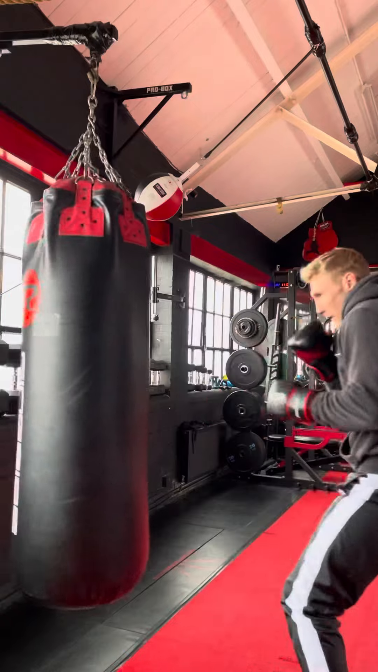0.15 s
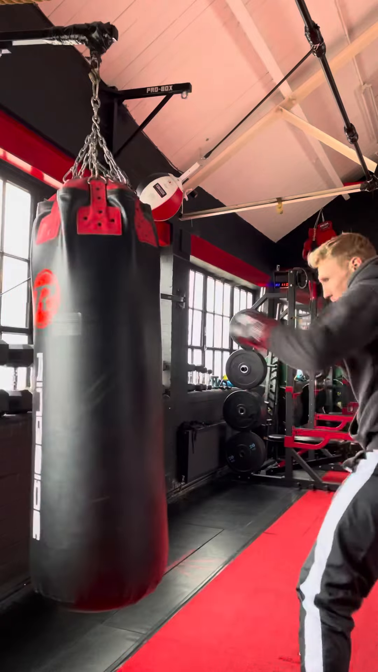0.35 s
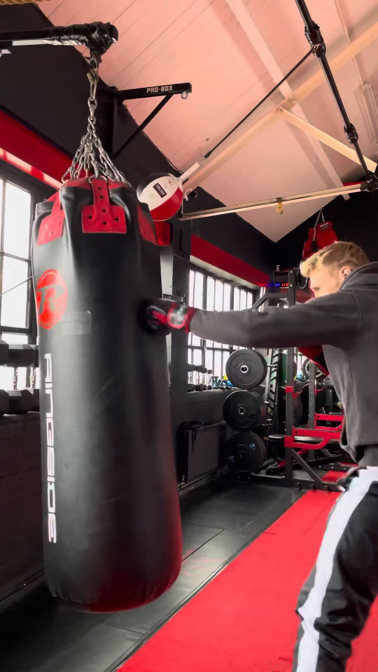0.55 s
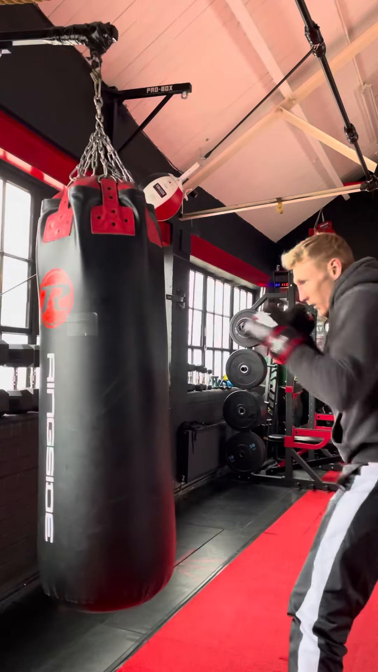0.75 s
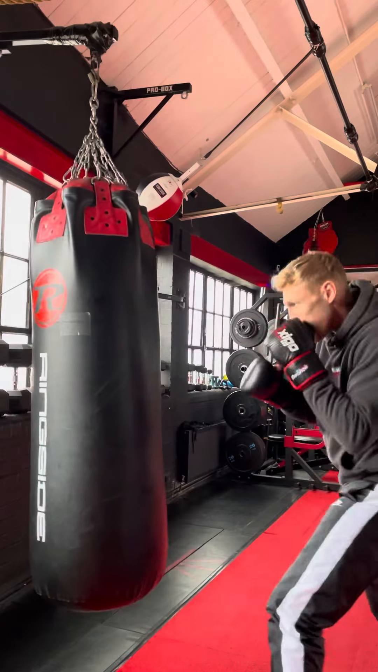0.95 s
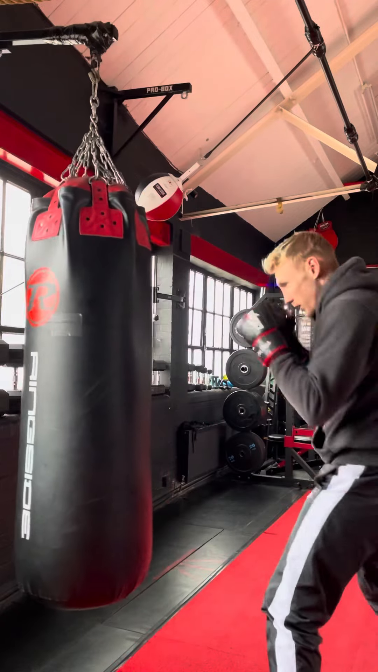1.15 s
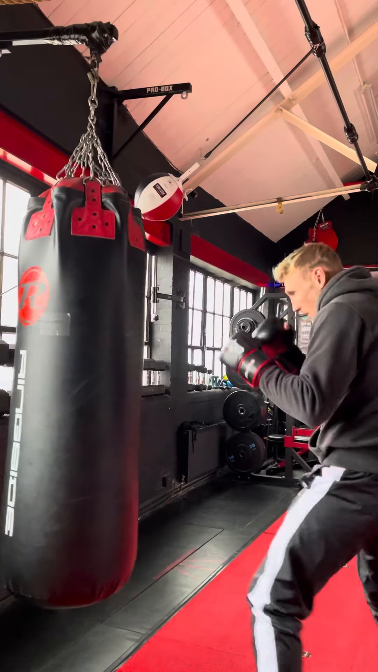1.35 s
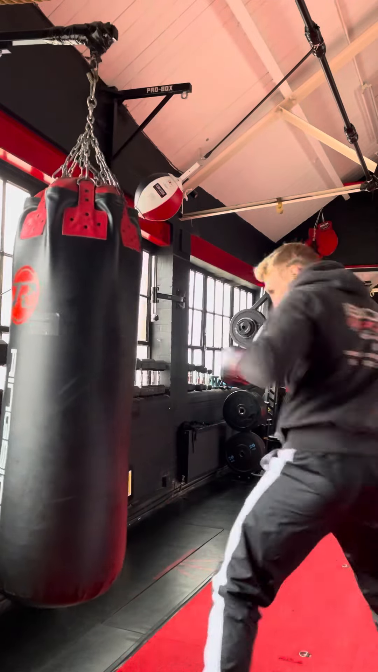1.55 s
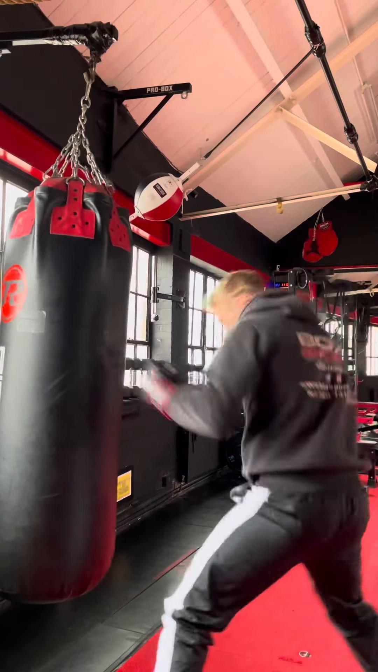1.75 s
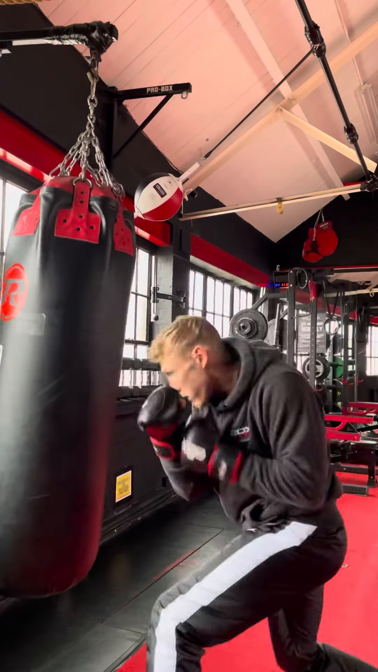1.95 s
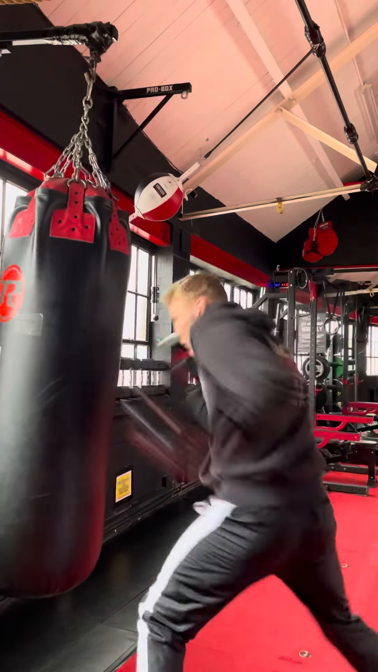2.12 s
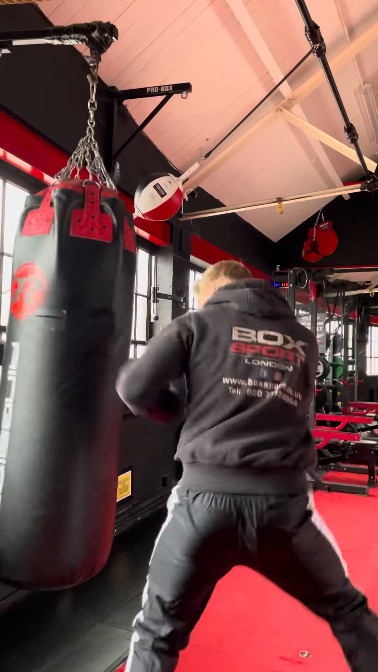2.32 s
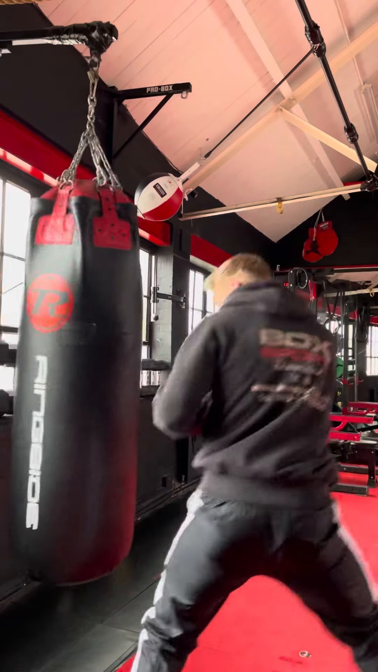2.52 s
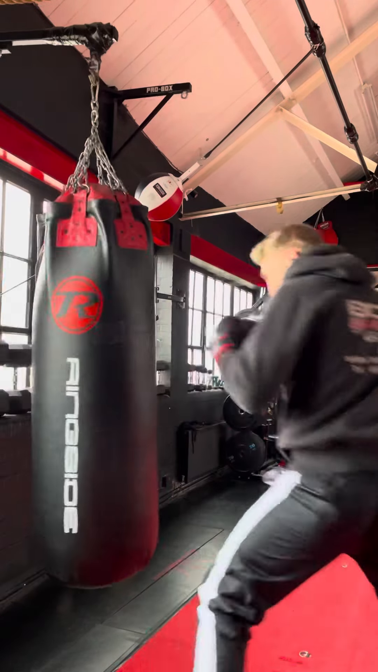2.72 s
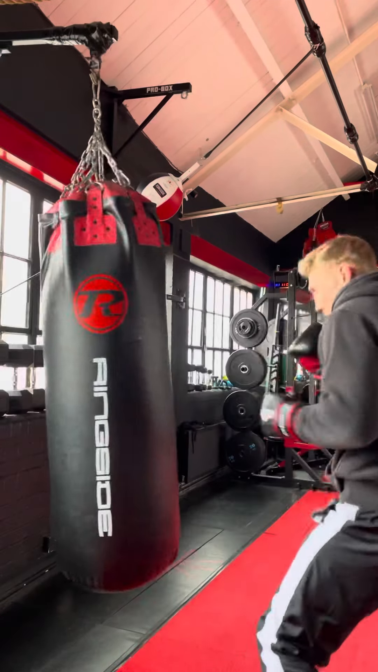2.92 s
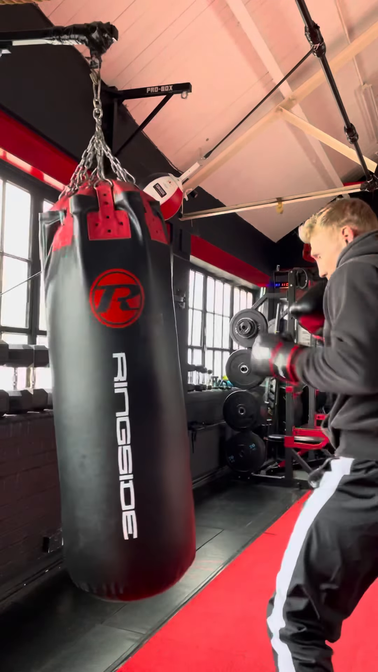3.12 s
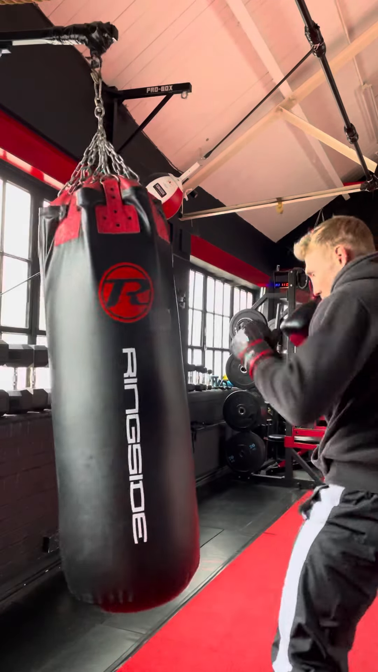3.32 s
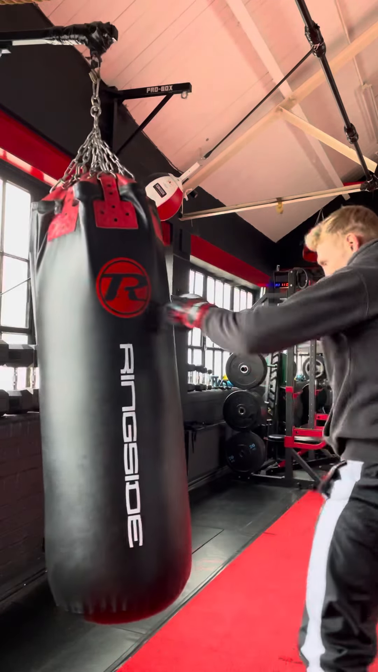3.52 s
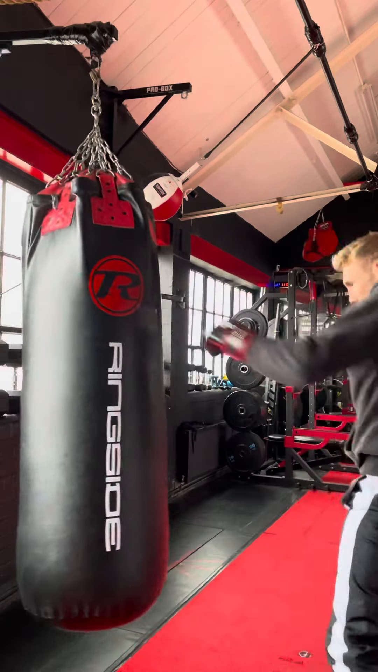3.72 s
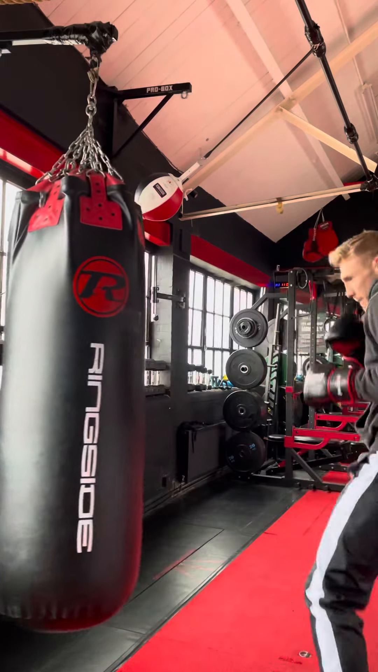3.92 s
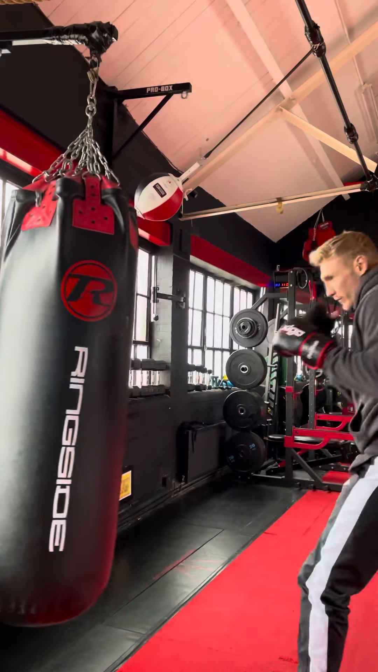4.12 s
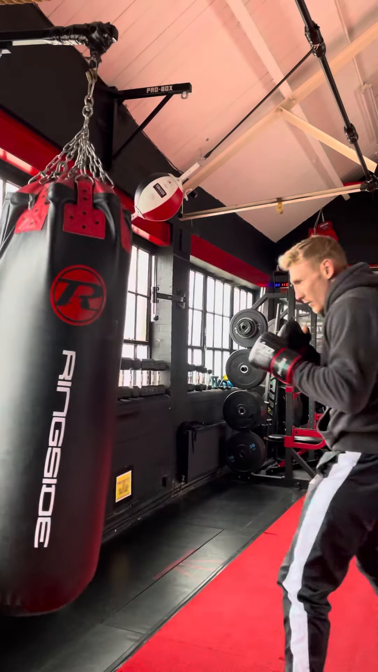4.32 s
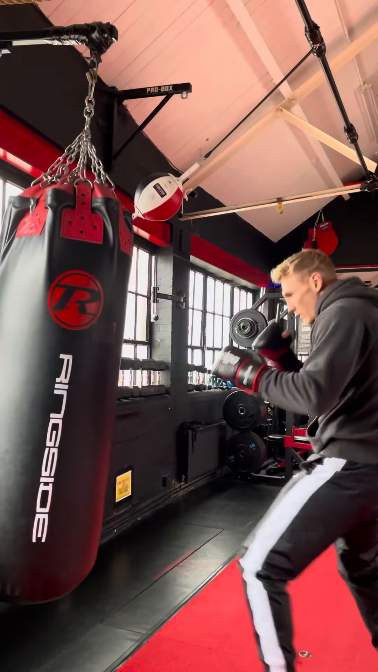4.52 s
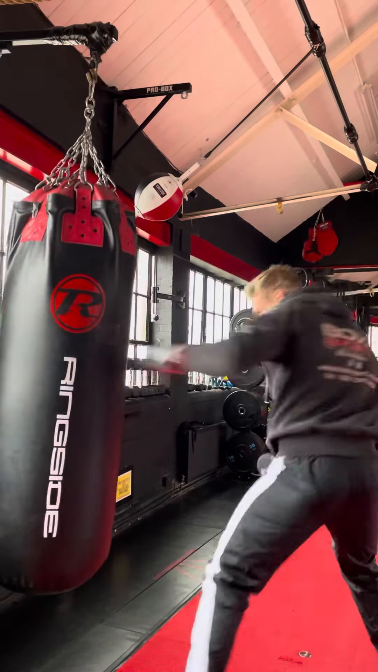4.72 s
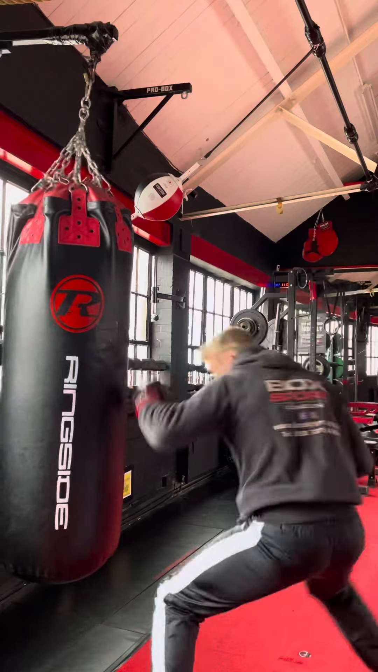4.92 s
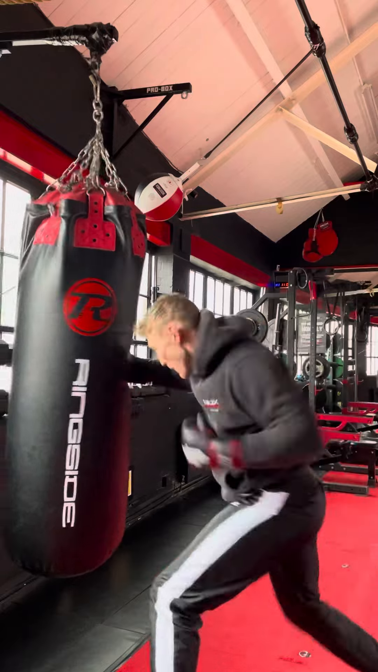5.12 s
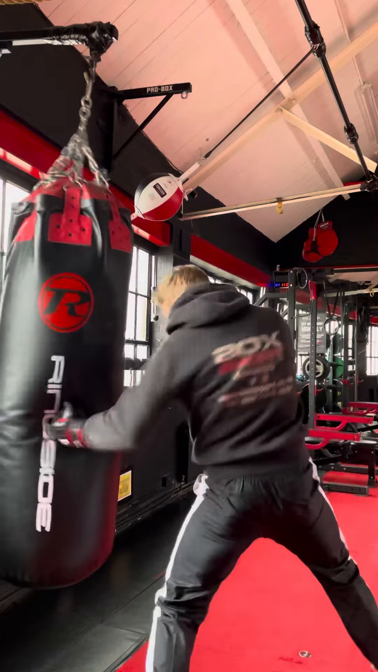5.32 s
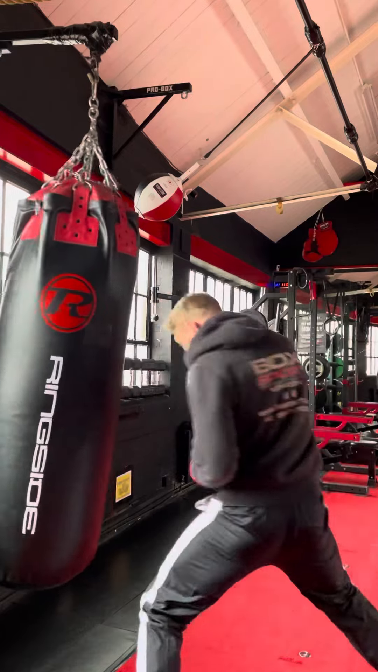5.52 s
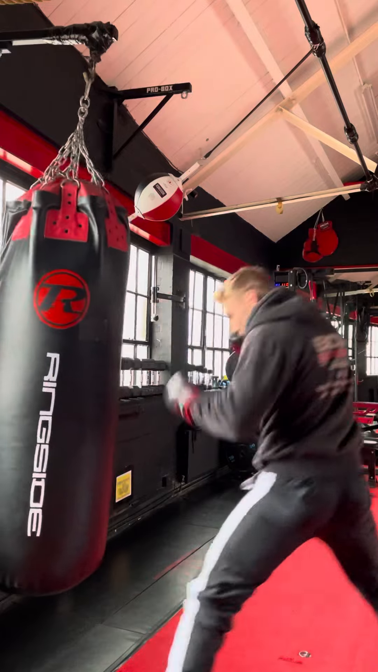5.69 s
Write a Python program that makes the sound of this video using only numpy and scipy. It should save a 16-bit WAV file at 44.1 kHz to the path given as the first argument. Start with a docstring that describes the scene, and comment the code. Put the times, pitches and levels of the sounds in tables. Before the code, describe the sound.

Gloved fists hit a hanging leather heavy bag, heard close up in an echoing gym over faint, low room noise. A light punch lands at about 0.5 seconds, followed by a few thin chain clinks. Hard blows come at 1.6 and 2.2 seconds, each a sharp slap with a low thud and a bass-heavy echo lasting under a second; the second is deeper. The chain jingles and clinks very high from 1.7 until just after 3 seconds. A quieter stretch follows, with soft shoe scuffs, rustling clothes and a faint creak from the swaying bag. Three hard punches land quickly at about 4.8, 5.1 and 5.3 seconds, the last two with a deeper thump. The chain jingles again until the end, near 6 seconds, while a low hum from the wall bracket grows underneath.

```python
"""Sharp cracks and thuds boom through a gym: gloved fists hitting a hanging heavy bag.
Each glove slaps the leather and flattens; a low pulse follows, and the far walls answer in throbs.
Loaded chain links slip with high clinks, the shaken chain jingles and the wall bracket hums.
Feet and clothes scuff between the blows. A phone with two microphone ports hears it from close by."""
import sys
import numpy as np
from scipy import signal
from scipy.fft import rfft, irfft, next_fast_len
from scipy.io import wavfile
from scipy.ndimage import uniform_filter1d

SR = 44100
rng = np.random.default_rng(int(sys.argv[2]) if len(sys.argv) > 2 else 0)


def to_wav(s):
    """Save 16-bit WAV."""
    ch = np.atleast_2d(s).T  # columns
    pcm = np.round(np.clip(ch, -1, 1) * 32767)  # PCM
    wavfile.write(sys.argv[1], SR, pcm.astype(np.int16))


N = 253619

# The blows: (time [s], force [dB], crack [dB], second slap re first [dB], its delay [s], kind)
PUNCHES = [(0.461, -38.5, -17.5, -11, 0.0028, "straight"), (1.6425, -22.5, -7, -7, 0.0044, "straight"),
           (2.2078, -22.5, -6, 3.5, 0.0054, "hook"), (4.754, -22, -4.5, -4, 0.0041, "straight"),
           (5.1201, -22, -8, -2.5, 0.0047, "hook"), (5.3274, -22, -6, -0.5, 0.0027, "hook")]
# Layer balance of a full blow, by kind: (thud [dB], throbs [dB], heave [dB], hiss [dB],
# low pulse (delay [s], pitch [Hz], level re thud [dB]))
BLOW_KINDS = {"straight": (9.9, 3.1, -23, -12, (0.0237, 122, 0.81)),
              "hook": (15.7, -18, 2.5, 1.5, (.015, 62, -6.5))}
FULL_DB, LEAD_IN_S = -21, .03  # force of a full blow; room for the hiss before the crack
THUD_SLOPE, DEEP_SLOPE = 0.88, 3.3  # dB per dB of force


def punch(force_db, crack_db, second_db, delay, kind):
    """A brief hiss swells, then the glove hits; with less force, heave and hiss fade faster than thud."""
    thud_db, throb_db, heave_db, hiss_db, pulse = BLOW_KINDS[kind]
    over_db = force_db - FULL_DB
    deep_db = FULL_DB + DEEP_SLOPE * over_db
    t = np.arange(SR // 2) / SR - LEAD_IN_S
    age = np.maximum(t, 0)
    slap, noise = rng.standard_normal((2, len(t)))
    swell = np.exp(-(np.minimum(t + 0.0024, 0) / 0.0067) ** 2 - age / 0.0004)
    hiss = evened(colour(noise, RUSTLE_EQ)) * swell
    return (gain_of(crack_db) * crack(t, age, slap, second_db, delay)
            + gain_of(deep_db + hiss_db) * hiss
            + gain_of(FULL_DB + thud_db + THUD_SLOPE * over_db) * thud(t, age, noise, *pulse)
            + gain_of(deep_db + heave_db) * heave(age)
            + gain_of(force_db + throb_db) * throbs(t))


# Tone of glove on leather: (frequency [Hz], level [dB])
SLAP_EQ = [(200, 12), (1200, 4), (2500, -0.5), (4200, -1), (6000, -2), (9000, -4), (13000, -34)]
SNAP_S, STUTTER_S = .00028, .0017  # attack of a slap; gap within the second slap


def crack(t, age, noise, second_db, delay):
    """The glove slaps twice, the second time in two parts, over a short noisy tail."""
    rises = [np.maximum((t - s) / SNAP_S, 0) for s in (0, delay, delay + STUTTER_S)]
    first, second, stutter = (rise * np.exp(1 - rise) for rise in rises)
    tail = (t > 0) * gain_of(-14 - 60 * age / 0.063)
    return evened(colour(noise, SLAP_EQ)) * (first + gain_of(second_db) * (second + stutter) + tail)


# Modes of the struck bag and thin ring of the bracket arm: (pitch [Hz], level re thud [dB], t60 [s])
LEATHER_MODES = [(176, -8, 0.053), (332, -15, 0.036)]
ARM_MODES = [(2090, -25, 0.72), (4160, -23.5, 0.64)]


def thud(t, age, noise, pulse_s, pulse_hz, pulse_db):
    """Pitch dives as the glove flattens; a low pulse follows about 20 ms on, like a near wall's echo."""
    turns = np.cumsum((t > 0) * (245 + 1600 * np.exp(-age / 0.001027))) / SR
    knock = np.sin(2 * np.pi * turns) * bump(t - 0.0045, 0.0035)
    leather = ring(LEATHER_MODES, age) * (1 - bump(age, 0.00097))
    pulse = gain_of(pulse_db) * np.cos(2 * np.pi * pulse_hz * (t - pulse_s)) * bump(t - pulse_s, 0.0052)
    arm = ring(ARM_MODES, age) * (1 - np.exp(-age / 0.079)) * evened(uniform_filter1d(noise, size=900))
    return knock + leather - pulse + arm


# Low modes of the whole bag: (pitch [Hz], level [dB], t60 [s])
HEAVE_MODES = [(39.4, -4.5, 1), (60, -3, 0.13)]


def heave(age):
    """The whole bag answers with a soft-edged bass note."""
    return ring(HEAVE_MODES, age) * (1 - np.exp(-age / 0.0043))


# Bass returns from the far walls: (delay [s], pitch [Hz], level [dB])
THROBS = [(0.063, 105, -0.5), (.13, 116, -1.5), (.245, 105, -3), (0.323, 111, -9.5)]
THROB_S = 0.014  # half-width of one throb


def throbs(t):
    """The boom comes back as separate low pulses."""
    return sum(gain_of(db) * np.sin(2 * np.pi * hz * (t - s)) * bump(t - s, THROB_S)
               for s, hz, db in THROBS)


# Reverb send of a blow: (frequency [Hz], level [dB])
BOOM_EQ = [(45, 10), (100, 17), (200, 13.5), (400, 10), (1000, 2.5), (2500, -2.5), (5000, -4.5),
           (9000, -10), (13000, -17.5)]


def boom(force_db):
    """A blow fills the hall with a bass-heavy tail whose first 0.1 s sits at the force level."""
    tail = colour(hall(), BOOM_EQ)
    return gain_of(force_db) * tail / np.sqrt(np.mean(tail[:, :SR // 10] ** 2))


# The loudest slips of a link or hook: (time [s], level [dB], pitch [Hz])
CLINKS = [(0.073, -35, 10370), (0.076, -34, 11500), (0.863, -29.5, 11650), (0.952, -17.5, 11650),
          (1.1314, -20.5, 11650), (1.3145, -22, 11700), (1.687, -17.5, 11460), (1.924, -20.5, 11850),
          (2.014, -22, 11630), (2.1106, -16, 11550), (2.403, -24.5, 11000), (2.5073, -18.5, 9180),
          (2.535, -22, 9500), (2.657, -30.5, 5310), (2.73, -19.5, 12080), (2.748, -21, 9080),
          (2.7594, -20.5, 9470), (2.8284, -17, 11300), (2.927, -27, 10800), (2.9338, -15.5, 11480),
          (3.0265, -25, 11500), (3.1154, -26.5, 11630), (3.388, -38.5, 9730), (4.806, -15, 11550),
          (5.06, -15, 11330), (5.3763, -20, 10970), (5.635, -22, 11550)]
SLIPS_PER_S, SLIP_DB, SLIP_HZ, SLIP_SPREAD_HZ = 4, 2, 11450, 150  # faint random slips; dB re the shake


def clink(db, hz):
    """A loaded link slips and rings; high links bend up as the load comes on, low ones ring longer."""
    t = np.arange(SR // 4) / SR
    judder, waver = (evened(uniform_filter1d(v, size=60)) for v in rng.standard_normal((2, len(t))))
    bend = (hz > 8000) * 0.031 * (.3 - np.exp(-t / 0.0136))
    turns = np.cumsum(hz * (1 + bend + 0.0091 * waver)) / SR
    envelope = gain_of(db - 60 * t * hz / 780 + 1.2 * judder) * np.minimum(t / 0.0086, 1)
    return envelope * np.sin(2 * np.pi * turns)


# Spells of jingling: (time [s], level [dB], length [s])
SHAKES = [(0, -54, 0.044), (0.15, -43, 0.11), (0.5, -37.5, 0.26), (0.77, -37, 0.17), (1.71, -23.5, 0.12),
          (1.841, -20.5, 0.21), (2.204, -23, 0.89), (4.782, -21.5, 0.37), (5.174, -19.5, 0.77)]
SHAKE_RISE_S, SAG_DB_PER_S, STOP_DB_PER_S, REST_DB = 0.05, 21.5, 80, -69


def shaking():
    """Gain envelope of the chain: each spell swells, sags while it lasts and then dies out."""
    s, db, length = np.array(SHAKES).T[:, :, None]
    t = np.arange(N) / SR - s
    attack = np.clip(t / SHAKE_RISE_S, 0, 1) ** 2
    fall_db = SAG_DB_PER_S * t + STOP_DB_PER_S * np.maximum(t - length, 0)
    return gain_of(REST_DB) + (attack * gain_of(db - np.maximum(fall_db, 0))).sum(0)


# Resonances of the links: (pitch [Hz], width [Hz], level [dB])
LINK_MODES = [(13200, 90, -10), (13340, 75, 0), (13520, 80, -5), (13720, 80, -7)]
# Band-pass on that ring, and tone of the fizz below it: (frequency [Hz], level [dB])
JINGLE_EQ = [(12900, -40), (13100, 0), (13850, 0), (14050, -40)]
FIZZ_EQ = [(5000, -18), (7500, 22), (9300, 14), (11500, 10), (12300, 22), (13300, -26)]


def chain(shake):
    """Shaken links ring in a narrow treble band over a grainy fizz."""
    jingle = shake * evened(colour(resonate(grainy(2.9, 0.065), LINK_MODES), JINGLE_EQ))
    fizz = gain_of(-20.5) * shake ** 0.94 * evened(colour(grainy(3.1, 0.023), FIZZ_EQ))
    return jingle + fizz


# The clearest scuffs: (time [s], level [dB], centre [Hz], decay time [s])
SCUFFS = [(0.211, -43, 3030, 0.0028), (0.311, -48.5, 1220, 0.005), (0.641, -41.5, 3600, 0.013),
          (0.8066, -40, 2360, 0.0087), (0.93, -43, 3450, 0.02), (1.541, -48.5, 694, 0.031),
          (2, -40.5, 3330, 0.042), (2.653, -36, 5560, 0.021), (2.781, -35, 214, 0.14),
          (2.932, -35.5, 332, 0.027), (3.025, -31, 1920, 0.0052), (3.04, -37, 2840, 0.021),
          (3.388, -46.5, 2070, 0.0064), (3.542, -40, 336, 0.12), (3.561, -42.5, 3260, 0.0071),
          (4.192, -52, 4400, 0.01), (3.844, -47, 2770, 0.0094), (4.2546, -47, 295, 0.071),
          (4.344, -46, 403, 0.54)]
# Faint random scuffs; dB re the stir of bag and clothes
BRUSHES_PER_S, BRUSH_DB, BRUSH_HZ, BRUSH_S = 2, -4, (1000, 4000), (.005, .03)


def scuff(db, hz, length):
    """Sole or cloth touches with a tick, then brushes: a noise band, wider when shorter or lower."""
    t = np.arange(0, .05 + 4 * length, 1 / SR)
    wide = 1 + 120 / hz + .006 / length
    band = [(hz / wide ** 4, -70), (hz / wide, -6), (hz, 0), (hz * wide, -6), (hz * wide ** 4, -70)]
    tick_band = [(hz * (f / hz) ** 3, level) for f, level in band]  # three times the octaves
    brush = evened(colour(rng.standard_normal(len(t)), band))
    tick = evened(colour(colour(rng.standard_normal(len(t)), RUSTLE_EQ), tick_band))
    tick *= 2 * np.exp(-t / 0.0018 - length / 0.28)  # fainter in long slides
    return gain_of(db) * (np.minimum(t / 0.004, 1) * np.exp(-t / length) * brush + tick)


# Fader moves: (time [s], bracket hum [dB], stir of bag and clothes [dB])
MOTION = [(0, -54, -42.5), (.42, -53, -49), (.95, -47, -44), (1.25, -53, -55.5), (1.5, -42.5, -56.5),
          (2.0, -50, -41.5), (2.72, -39.5, -37.5), (2.86, -45.5, -41.5), (3.45, -56.5, -47.5),
          (3.8, -43.5, -47.5), (4.1, -56, -55), (4.25, -43, -51.5), (4.7, -49, -52), (5.05, -37, -34),
          (5.75, -29.5, -39.5)]


def motion():
    """Gain envelopes of the hum and the stir."""
    times, *faders = np.transpose(MOTION)
    return [gain_of(np.interp(np.arange(N) / SR, times, db)) for db in faders]


# Resonances of the wall bracket: (pitch [Hz], width [Hz], level [dB])
BRACKET_MODES = [(75.5, 10.5, -2), (94.5, 24, -0.5)]


def bracket(hum):
    """The bracket hums low, with a flickering level."""
    return hum * resonate(grainy(flicker_db=4, grain_s=0.05), BRACKET_MODES)


# Tone of the bag's creak: (frequency [Hz], level [dB])
CREAK_EQ = [(100, -5.5), (170, -2), (330, -4.5), (450, -4.5), (800, -11), (2500, -30)]
SWAY_HZ, SWAY_WIDTH_HZ, SWAY_DB = 46.4, 11, -10  # dB re the stir


def swinging_bag(stir):
    """The bag sways with a deep rumble and a grainy creak."""
    sway = gain_of(SWAY_DB) * resonate(grainy(3.5, 0.14), [(SWAY_HZ, SWAY_WIDTH_HZ, 0)])
    creak = evened(colour(grainy(3.1, .02), CREAK_EQ))
    return stir * (sway + creak)


# Tone of rustling cloth, also used for hiss and ticks: (frequency [Hz], level [dB])
RUSTLE_EQ = [(300, -18), (800, -4), (1500, -2), (3000, -4), (5000, -6.5), (7000, -7), (10000, -143)]
RUSTLE_DB, STIR_MID_DB, RUSTLE_SLOPE = -52, -47, 1.3  # level at middling stir; that stir; dB per dB


def clothes(stir):
    """Cloth rustles, growing faster than the stir."""
    level = gain_of(RUSTLE_DB) * (stir / gain_of(STIR_MID_DB)) ** RUSTLE_SLOPE
    return level * evened(colour(grainy(4.3, 0.11), RUSTLE_EQ))


# Reverb time of the gym: (frequency [Hz], t60 [s])
HALL_DECAY = [(60, 0.64), (250, 0.76), (1500, 0.93), (4000, 0.85), (12000, 0.51)]


def hall():
    """Two tails of sparse reflections of random sign, each band dying at its own speed."""
    taps = np.zeros((2, 3 * SR // 2))
    slots = np.arange(400, taps.shape[1] - 16, 16)
    at = slots + rng.integers(0, 16, (2, len(slots)))
    np.put_along_axis(taps, at, rng.choice([-1., 1.], at.shape), 1)
    hz, t, bands = signal.stft(taps, SR, nperseg=512)
    ripple_db = 2.16 * evened(uniform_filter1d(rng.standard_normal(bands.shape[1:]), size=9, axis=0))
    decay_db = 60 * t / read(HALL_DECAY, hz)[:, None]
    tail = signal.istft(bands * gain_of(ripple_db - decay_db), SR, nperseg=512)[1]
    tail *= 1 - 0.52 * bump(np.arange(tail.shape[1]) / SR, 0.032)  # the returns build up
    return tail / np.linalg.norm(tail[0])


# Room tone: (frequency [Hz], level [dB])
AIR_EQ = [(25, -55), (97, -11.5), (217, -27), (4870, -56), (7310, -70), (10100, -93), (14000, -96)]
AIR_DB = -56.5


def air():
    """Still air lays a dark, nearly steady bed."""
    return gain_of(AIR_DB) * evened(colour(grainy(0.67, 0.046), AIR_EQ))


# Match of spread sound between the ports: (frequency [Hz], likeness [0-1])
PORT_LIKENESS = [(100, 1), (250, 0.99), (500, 0.79), (3000, 0.24), (7000, 1), (12000, 0.97)]
# Left port ahead of right: (frequency [Hz], phase [rad])
PORT_PHASE = [(150, 0), (1030, -.5), (1810, -.1), (4050, -.9), (5800, -1.5), (7000, -3.1), (8300, -3.1),
              (10100, -.2), (12300, .3), (12700, 2.7)]
# Left port over right: (frequency [Hz], level [dB])
PORT_BALANCE = [(100, 0.5), (270, 0.5), (700, 6.5), (1300, 3), (2400, 0.5), (8000, 1)]


def ports(direct, spread):
    """Two ports hear direct sound alike and spread sound partly alike, shifted in phase and level."""
    size = next_fast_len(N)
    hz = np.fft.rfftfreq(size, 1 / SR)
    likeness = np.clip(read(PORT_LIKENESS, hz), 0, 1)
    centre = rfft(direct, size)
    shared, apart = rfft(spread, size)
    shift = gain_of(read(PORT_BALANCE, hz) / 2) * np.exp(.5j * read(PORT_PHASE, hz))
    left = (centre + shared) * shift
    right = (centre + likeness * shared + np.sqrt(1 - likeness ** 2) * apart) / shift
    return irfft(np.array([left, right]), size)[:, :N]


def gain_of(db):
    """dB to amplitude."""
    return 10 ** (np.asarray(db) / 20)


def evened(x):
    """Scales to rms 1."""
    return x / np.sqrt(np.mean(x ** 2) + 1e-20)


def bump(t, width):
    """Bell-shaped envelope around t = 0."""
    return np.exp(-(t / width) ** 2)


def read(points, hz):
    """Reads a spectrum table on a log-frequency axis."""
    f, value = np.transpose(points)
    return np.interp(np.log(hz + 1), np.log(f + 1), value)


def add(mix, s, sound):
    """Mixes a sound in at time s."""
    part = mix[round(s * SR):][:len(sound)]
    part += sound[:len(part)]


def colour(x, points):
    """Applies an EQ curve along the last axis."""
    size = next_fast_len(x.shape[-1])
    gain = gain_of(read(points, np.fft.rfftfreq(size, 1 / SR)))
    return irfft(rfft(x, size) * gain, size)[..., :x.shape[-1]]


def ring(modes, t):
    """Dying modes struck at t = 0."""
    return sum(gain_of(db - 60 * t / t60) * np.sin(2 * np.pi * hz * t) for hz, db, t60 in modes)


def resonate(x, modes):
    """Sum of steep resonances (each applied twice)."""
    out = 0
    for hz, width, db in modes:
        carrier = np.exp(2j * np.pi * hz * np.arange(x.shape[-1]) / SR)
        pole = np.exp(-np.pi * width / SR)
        slow = signal.lfilter([1], np.convolve([1, -pole], [1, -pole]), x / carrier)
        out = out + gain_of(db) * evened((carrier * slow).real)
    return evened(out)


def grainy(flicker_db, grain_s):
    """Two unrelated noises whose level flickers together."""
    flicker = evened(uniform_filter1d(rng.standard_normal(N), max(round(grain_s * SR), 1)))
    return rng.standard_normal((2, N)) * gain_of(flicker_db * flicker)


def scene():
    """Close blows, scuffs and clinks over a wide bed; blows and clinks feed the hall."""
    hum, stir = motion()
    shake = shaking()
    near, links = np.zeros((2, N))
    spread = air() + bracket(hum) + swinging_bag(stir) + clothes(stir) + chain(shake)
    for s, force_db, *row in PUNCHES:
        add(near, s - LEAD_IN_S, punch(force_db, *row))
        add(spread.T, s, boom(force_db).T)
    for s, *row in SCUFFS:
        add(near, s, scuff(*row))
    for s, *row in CLINKS:
        add(links, s, clink(*row))
    for when, pitch, length in rng.random((round(BRUSHES_PER_S * N / SR), 3)):
        at = int(when * N)
        brush = scuff(BRUSH_DB, np.interp(pitch, (0, 1), BRUSH_HZ), np.interp(length, (0, 1), BRUSH_S))
        add(near, at / SR, stir[at] * brush)
    for when, pitch, size in rng.random((round(SLIPS_PER_S * N / SR), 3)):
        at = int(when * N)
        slip = clink(SLIP_DB, SLIP_HZ + SLIP_SPREAD_HZ * (2 * pitch - 1))
        add(links, at / SR, size * shake[at] * slip)
    echo = gain_of(-2.5) * signal.fftconvolve(links[None], hall(), axes=1)[:, :N]
    return ports(near + links, spread + echo)


LOW_CUT_HZ, CEILING, HIGH_CUT_HZ = 33, .95, 16100


def record(dry):
    """The microphone drops the deepest bass, the input rounds off peaks, and the top is band-limited."""
    low_cut = signal.butter(3, LOW_CUT_HZ, "high", fs=SR, output="sos")
    soft = CEILING * np.tanh(signal.sosfilt(low_cut, dry) / CEILING)
    high_cut = signal.firwin(511, HIGH_CUT_HZ, window=("kaiser", 9), fs=SR)
    return signal.oaconvolve(soft, high_cut[None], "same")


dry = scene()
out = record(dry)
to_wav(out)
```